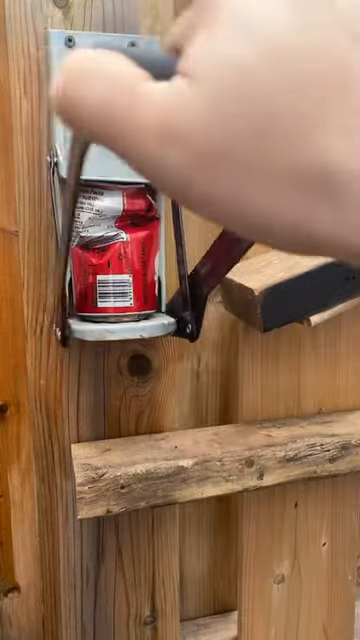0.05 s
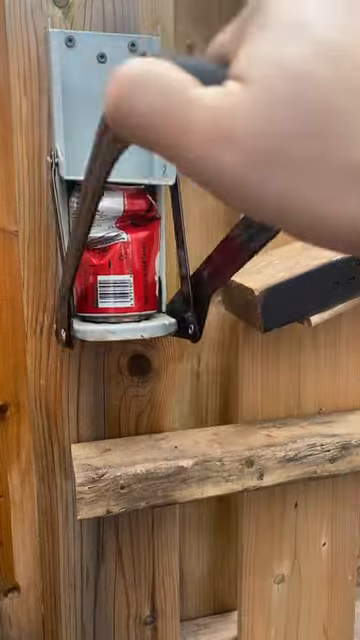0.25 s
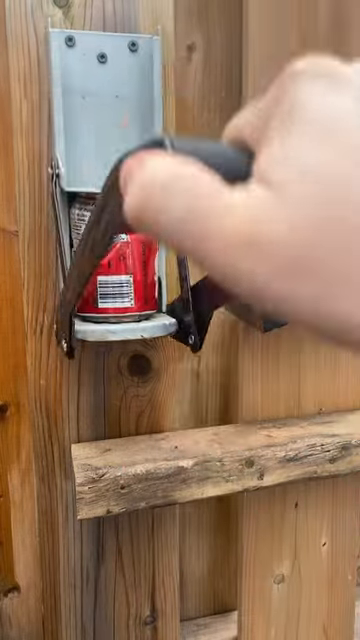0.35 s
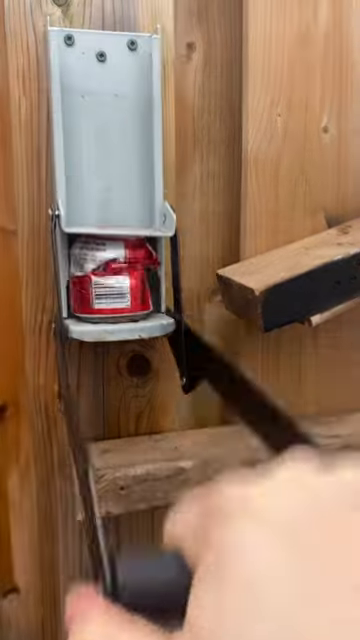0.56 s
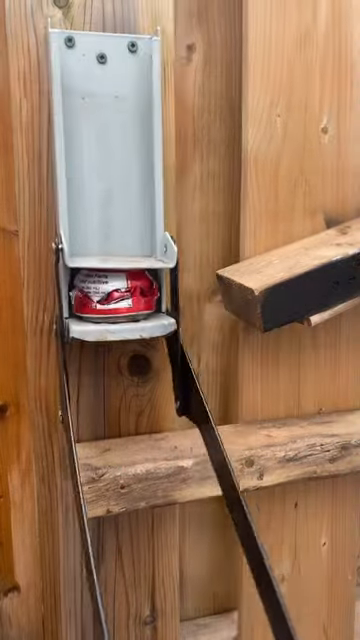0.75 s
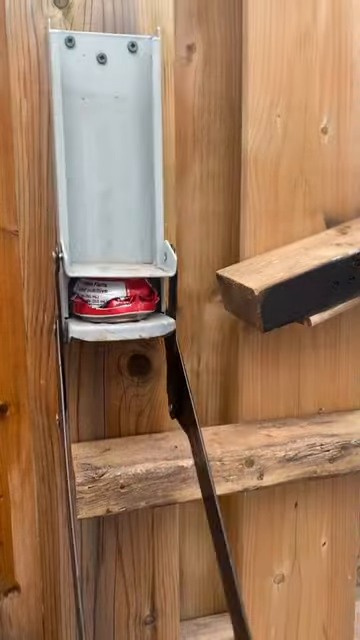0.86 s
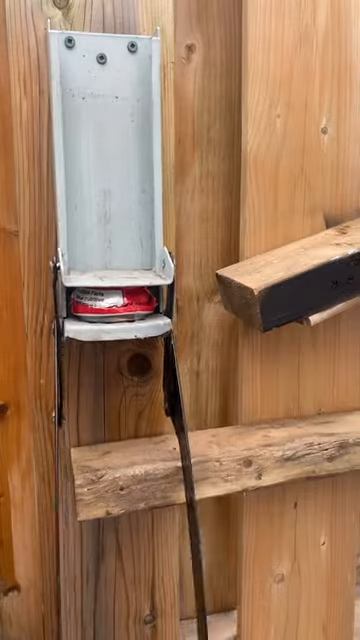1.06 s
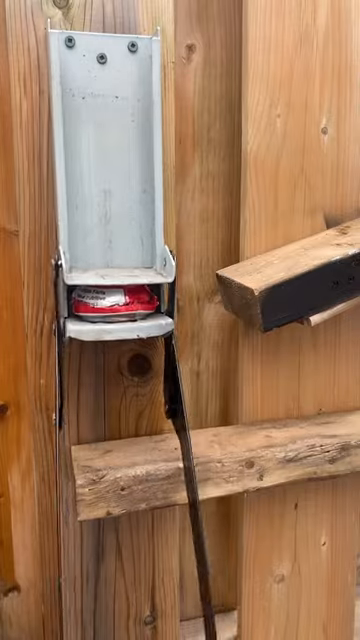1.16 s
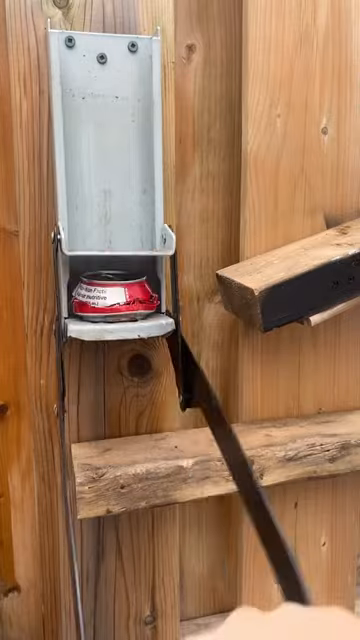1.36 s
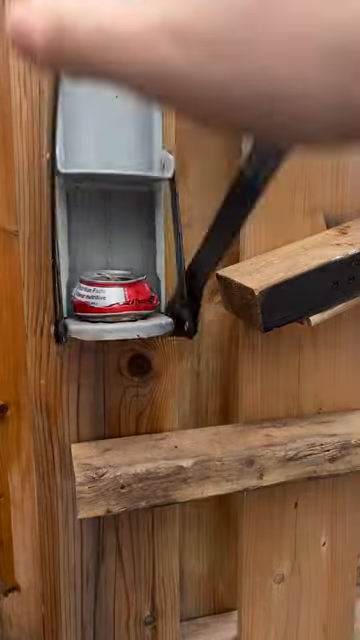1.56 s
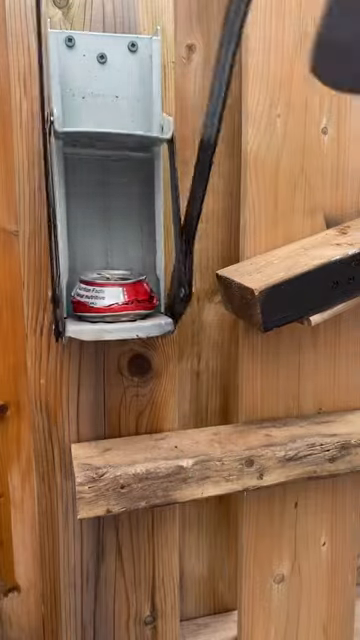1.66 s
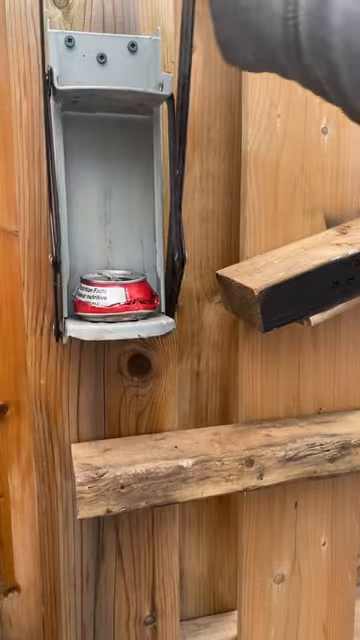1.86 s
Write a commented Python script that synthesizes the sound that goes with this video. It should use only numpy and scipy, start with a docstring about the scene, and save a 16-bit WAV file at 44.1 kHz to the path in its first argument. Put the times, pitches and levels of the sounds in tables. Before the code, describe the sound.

A drink can crunches close to the microphone, crackling and popping as a lever crusher flattens it. A few metal clanks follow as the handle hits its stop, then a short linkage rattle, over a faint outdoor rumble.

```python
"""An aluminium can is crushed close by in a lever crusher screwed to a wooden fence; the yard hums faintly.
From 0.24 to 0.8 s the wall gives way in sharp cracks and hollow pops, fine crinkling between them.
From 0.88 s the lever knocks against its stop and rebounds, ringing the steel frame.
At 1.8 s the lever is lifted and its linkage rattles."""
import sys
import numpy as np
from scipy import signal
from scipy.fft import rfft, irfft
from scipy.io import wavfile
from scipy.ndimage import uniform_filter1d

SR = 44100
rng = np.random.default_rng(int(sys.argv[2]) if len(sys.argv) > 2 else 0)


def wav_record(signal):
    """Record a signal, one row per channel, as 16-bit PCM in the file named by sys.argv[1]."""
    frames = np.transpose(np.atleast_2d(signal))
    bounded = np.clip(frames, -1, 1)
    # unit amplitude maps onto the largest positive 16-bit level
    quanta = np.round(bounded * 32767).astype(np.int16)
    wavfile.write(sys.argv[1], SR, quanta)


N = 83790
FFT_SIZE = 8192

# Lasting rings of the can and of the steel frame. Each row: pitch in Hz, level in dB, T60 in seconds.
CAN_MODES = [(341.7, -20, 0.41), (1660, -26, 0.11), (2233, -13.5, 0.033)]
FRAME_MODES = [(215, -35, .35), (990, -17, .1), (1250, -13, .06), (2220, -14, .065)]


def wall_folds():
    """The thin wall folds panel by panel, mostly with sharp cracks, twice with a dull, low pop."""
    # Each row: start in seconds, ring time in seconds, panel pitch in Hz, gain in dB at each of bands_hz.
    buckles = [(0.2403, 0.0041, 5160, -32, -24.5, -24.5, -16.5), (0.2547, 0.011, 1176, -45.5, -6, -26, -27),
               (0.2836, 0.0033, 8900, -44, -13, -18, -15.5),
               (0.3031, 0.0052, 482, -15.5, -20.5, -56.5, -55),
               (0.3625, 0.0055, 4350, -12, -2, -11.5, -18.5), (0.3688, 0.0054, 5740, -3.5, -0.5, -11, -24),
               (0.3758, 0.012, 1770, -9.5, -4.5, -7, -12), (0.393, 0.003, 1140, -4.5, -13, -20.5, -24.5),
               (0.477, 0.0017, 8200, -52, -20, -26, -20), (0.5016, 0.004, 5250, -17, -36.5, -28, -20),
               (0.5725, 0.0041, 1987, -24, -24, -26.5, -39), (0.6223, 0.0038, 4960, -45, -14.5, -17.5, -19),
               (0.637, 0.001, 5500, -45, -29, -27.5, -46), (0.678, 0.0081, 525, -19.5, -20.5, -37.5, -51),
               (0.7599, 0.0045, 2570, -20, -28, -28, -45),
               (0.7897, 0.0036, 2060, -26.5, -11.5, -14.5, -21.5)]
    # Thin wall. Each row: frequency in Hz, gain in dB.
    wall_colour = [(20, -43), (150, -5.5), (13000, -.5), (16600, -24.5)]
    bands_hz = [520, 1550, 4500, 10500]  # body, pop, crack, fizz
    out = np.zeros((2, N))
    for start_s, ring_s, panel_hz, *gains_db in buckles:
        fold = snap(ring_s, deformed_modes(gain_db=-8.5), click=0.29)
        resonance = panel(panel_hz, width=0.23, height_db=11)
        add(out, start_s, coloured(fold, list(zip(bands_hz, gains_db)), resonance, wall_colour))
    return out


def dent_pops():
    """Dents flip through without cracking: hollow pops that set the can ringing."""
    # Each row: start in seconds, pitch in Hz, gain at that pitch in dB.
    dents = [(0.266, 2080, -12.5), (0.4143, 1250, -6.5), (0.4578, 2180, -18), (0.486, 1640, -16),
             (0.4928, 1400, -13), (0.504, 1360, -9.5), (0.5117, 1470, -12), (0.532, 1540, -15.5),
             (0.5359, 1730, -18), (0.558, 2030, -16.5), (0.5862, 1030, -4.5), (0.6454, 2000, -16),
             (0.711, 1620, -24.5)]
    # Hollow tone. Each row: frequency in Hz, gain in dB.
    pop_colour = [(20, -27.5), (380, -1), (2500, 1), (3400, -14.5), (16000, -47.5)]
    ring_s, peak_db = 0.0015, 9.5
    out = np.zeros((2, N))
    for start_s, hz, db in dents:
        pop = snap(ring_s, deformed_modes(gain_db=-1), click=0.73)
        resonance = panel(hz, width=0.39, height_db=peak_db)
        add(out, start_s, amp(db - peak_db) * coloured(pop, resonance, pop_colour))
    return out


def panel(hz, width, height_db):
    """Resonance of a flipping panel as a (Hz, dB) table; width is relative."""
    return [(hz / (1 + width), 0), (hz, height_db), (hz * (1 + width), 0)]


def deformed_modes(gain_db):
    """The can's rings shift from fold to fold as it deforms."""
    detune = 0.013
    return [(hz * (1 + detune * rng.uniform(-0.77, 1)), db + gain_db, t60) for hz, db, t60 in CAN_MODES]


def snap(ring_s, modes, click):
    """Sudden slip of sheet metal: click, dense ring (1/e in ring_s at 2 kHz) and modes."""
    t, hz = np.arange(FFT_SIZE) / SR, np.fft.rfftfreq(FFT_SIZE, 1 / SR)
    ring = np.zeros((2, FFT_SIZE))
    for centre_hz, band in octaves(stereo_noise(FFT_SIZE, apart=0.38)):
        decay_s = ring_s * (2000 / centre_hz) ** 0.058
        dying = band * np.exp(-t / decay_s)
        ring += dying * np.sqrt(np.mean(band ** 2) / np.sum(dying ** 2) * 2)
    ring[:, 0] += click
    ring *= np.sqrt(SR / 100 / (1 + click ** 2))
    for mode_hz, db, t60 in modes:
        ring += amp(db - 60 * t / t60) * np.sin(2 * np.pi * mode_hz * t)
    delay_s = 0.001 * np.maximum((1000 / (hz + 100)) ** 0.687 - 0.25, 0)  # bass trails treble
    lag_rad = 2 * np.pi * np.cumsum(delay_s) * SR / FFT_SIZE
    fade = np.minimum(2 * (1 - t / t[-1]), 1) ** 2
    return fade * irfft(rfft(ring) * np.exp(-1j * lag_rad))


def lever_knocks():
    """The handle hits its stop, rebounds, and clatters on the way up."""
    # Each row: start in seconds, gain in dB at each of bands_hz.
    knocks = [(0.8834, -14.5, -12.5, -22, -21.5), (0.9097, -24, -50, -60, -23), (0.9453, -8, -21, -26, -85),
              (1.14, -10.5, -28.5, -30.5, -43.5), (1.159, -17, -36.5, -41.5, -57),
              (1.183, -24, -41, -40, -52), (1.2393, -23.5, -35, -32, -29.5),
              (1.248, -18, -37.5, -26.5, -31.5), (1.803, -19, -37.5, -37.5, -36.5),
              (1.834, -29, -26, -23, -23), (1.841, -17, -32.5, -26.5, -33.5), (1.875, -35, -25, -23, -27.5)]
    # Steel frame. Each row: frequency in Hz, gain in dB.
    frame_colour = [(20, -36), (130, -7), (350, 2), (620, 6), (2400, 5), (3400, -7), (5300, -1),
                    (16000, -30)]
    bands_hz = [260, 600, 1550, 4500]  # thud, body, clank, click
    out = np.zeros((2, N))
    for start_s, *gains_db in knocks:
        knock = snap(ring_s=0.0058, modes=FRAME_MODES, click=0.27)
        add(out, start_s, coloured(knock, list(zip(bands_hz, gains_db)), frame_colour))
    return out


def crinkle():
    """Fine creases form while the can is under load."""
    # Each row: time in seconds, level in dB.
    envelope = [(.23, -61.5), (.27, -37.5), (.34, -47), (.39, -39), (.6, -40), (.87, -65.5), (.92, -38),
                (1.0, -59.5)]
    # Each row: frequency in Hz, relative gain in dB.
    colour = [(20, -15), (300, -3), (2200, -16.5), (3300, -18.5), (16500, -42)]
    return slips(envelope, [], colour)


def linkage_rattle():
    """The linkage rubs and rattles in its play, ringing the frame."""
    # Each row: time in seconds, level in dB.
    envelope = [(1.8, -58), (1.86, -30.5), (1.89, -37)]
    # Each row: frequency in Hz, relative gain in dB.
    colour = [(20, -5), (250, 5.5), (600, -4.5), (1050, -2), (16500, -28.5)]
    return slips(envelope, FRAME_MODES, colour)


def slips(envelope, modes, colour, rate_per_s=410):
    """Tiny random slips of metal in eight timbres; the envelope's last level holds."""
    out, t = np.zeros((2, N)), np.arange(N) / SR
    clicks = (rng.random(N) < rate_per_s / SR) * amp(3.8 * np.minimum(rng.exponential(1, N), 2))
    timbre = rng.integers(0, 8, N)
    for k in np.unique(timbre):
        tick = snap(ring_s=0.00072, modes=modes, click=0.17)
        out += signal.fftconvolve((clicks * (timbre == k))[None], tick, axes=1)[:, :N]
    level_db = np.interp(t, *np.transpose(envelope), left=-np.inf)
    return unit_rms(coloured(out, colour)) * amp(level_db)


def yard_reflections(x):
    """Short, diffuse reflections from fence and ground."""
    # Each row: frequency in Hz, T60 in seconds.
    decay = [(500, 0.27), (15000, 0.07)]
    t = np.arange(SR // 2) / SR
    bands = octaves(stereo_noise(len(t), apart=0.2))
    tail = sum(band * amp(-60 * t / at_hz(decay, hz)) for hz, band in bands)
    tail *= np.clip(t / 0.0011 - 0.5, 0, 1)
    return signal.fftconvolve(x, tail / np.linalg.norm(tail[0]), axes=1)[:, :N]


def air():
    """Outdoor background with a gently uneven rumble."""
    # Each row: frequency in Hz, relative spectral density in dB.
    spectrum = [(15, -22.5), (70, -3.5), (450, -19), (1100, -20), (2500, -26), (3600, -35), (9580, -37.5),
                (16500, -52)]
    # Each row: time in seconds, level in dB.
    envelope = [(.1, -50), (1.1, -55), (1.68, -50.5), (1.77, -61.5)]
    noise = coloured(stereo_noise(N + FFT_SIZE, apart=0.033), spectrum)[:, FFT_SIZE:]
    drift = uniform_filter1d(uniform_filter1d(rng.standard_normal(N), size=2500), size=2500)
    level_db = np.interp(np.arange(N) / SR, *np.transpose(envelope)) + 0.93 * unit_rms(drift)
    return unit_rms(noise) * amp(level_db)


def stereo_noise(samples, apart):
    """Common noise plus a weaker side signal without bass."""
    mid, side = rng.standard_normal((2, samples))
    side = signal.sosfilt(signal.butter(2, 300, "high", fs=SR, output="sos"), side)
    return (mid + apart * side * np.array([[1], [-1]])) / np.sqrt(1 + apart ** 2)


def coloured(x, *tables):
    """Causal filter whose gain is the sum of (Hz, dB) tables."""
    hz = abs(np.fft.fftfreq(FFT_SIZE, 1 / SR))
    log_gain = np.log(amp(sum(at_hz(table, hz) for table in tables)))
    taps = np.fft.ifft(np.exp(np.conj(signal.hilbert(log_gain)))).real[:FFT_SIZE // 2]
    return signal.fftconvolve(x, taps[None], axes=1)[:, :x.shape[1]]


def octaves(x):
    """Overlapping octave bands as (centre in Hz, band)."""
    centres_hz = 125 * 2. ** np.arange(8)
    log_hz = np.log(np.fft.rfftfreq(x.shape[-1], 1 / SR) + 1)
    gains = [np.interp(log_hz, np.log(centres_hz), pick) for pick in np.eye(8)]
    return [(hz, irfft(rfft(x) * gain, x.shape[-1])) for hz, gain in zip(centres_hz, gains)]


def at_hz(table, hz):
    """Table value on a log-frequency axis."""
    points_hz, values = np.transpose(table)
    return np.interp(np.log(hz + 1), np.log(points_hz + 1), values)


def add(mix, start_s, sound):
    """Mixes a stereo sound in at start_s."""
    part = mix[:, round(start_s * SR):][:, :sound.shape[1]]
    part += sound[:, :part.shape[1]]


def amp(db):
    """Decibels to gain."""
    return 10 ** (np.asarray(db) / 20)


def unit_rms(x):
    """Scales to rms 1."""
    return x / np.sqrt(np.mean(x ** 2) + 1e-20)


def scene():
    """Can and crusher close by, in the open yard."""
    near = wall_folds() + dent_pops() + lever_knocks() + crinkle() + linkage_rattle()
    return near + amp(-15) * yard_reflections(near) + air()


def record(dry):
    """Two spaced microphone ports, soft overload and a band limit."""
    # Each row: frequency in Hz, lead of the left port in radians.
    port_phase = [(1800, 0), (3100, 1.7), (4900, .1), (7400, 3.14), (10400, 6.28), (15500, 11.4)]
    lag_rad = at_hz(port_phase, np.fft.rfftfreq(2 * N, 1 / SR))
    right = irfft(rfft(dry[1], 2 * N) * np.exp(-1j * lag_rad))[:N]
    x = np.array([dry[0], right])
    clipped = x / (1 + x ** 6) ** (1 / 6)
    lowpass = signal.firwin(255, cutoff=16700, window=("kaiser", 9), fs=SR)
    return signal.oaconvolve(clipped, lowpass[None], "same")


dry = scene()
out = record(dry)
wav_record(out)
```